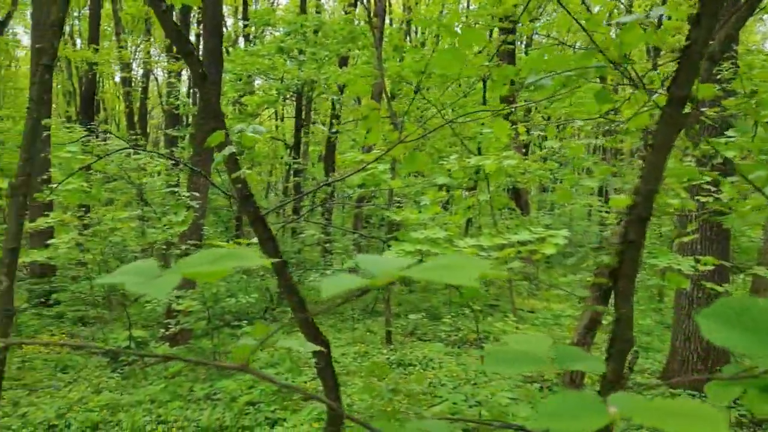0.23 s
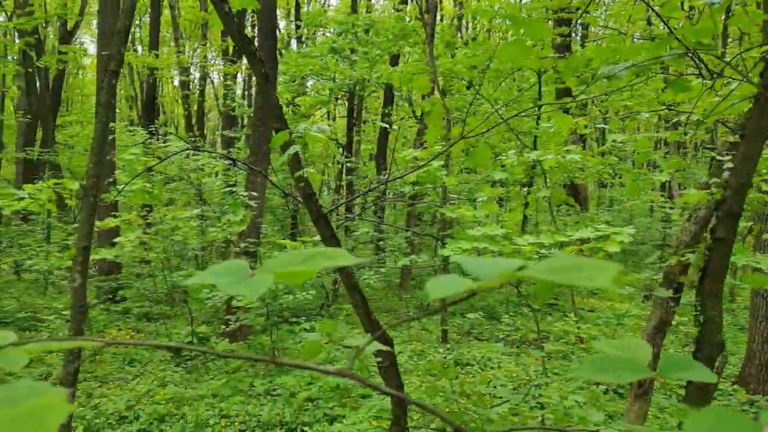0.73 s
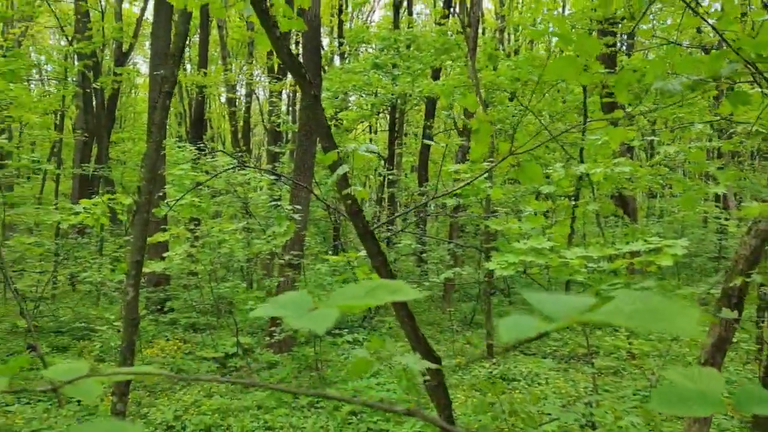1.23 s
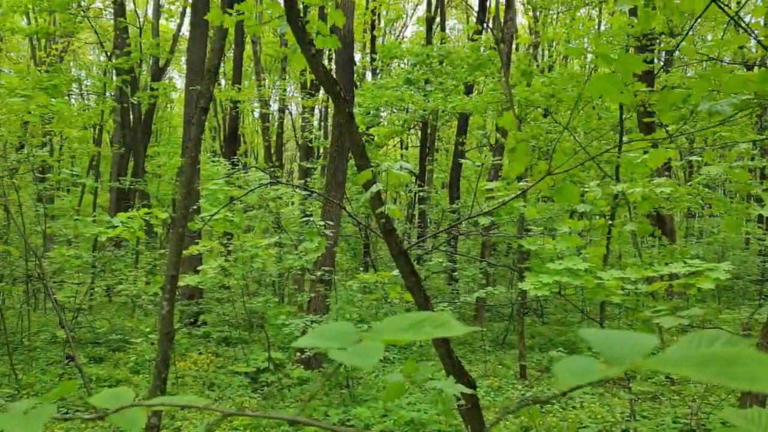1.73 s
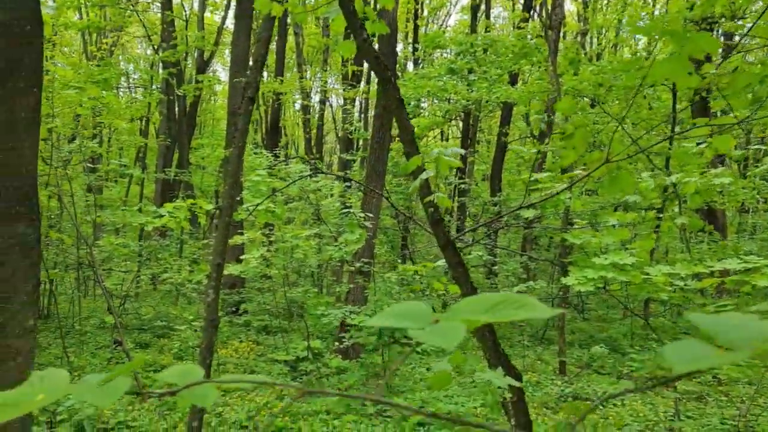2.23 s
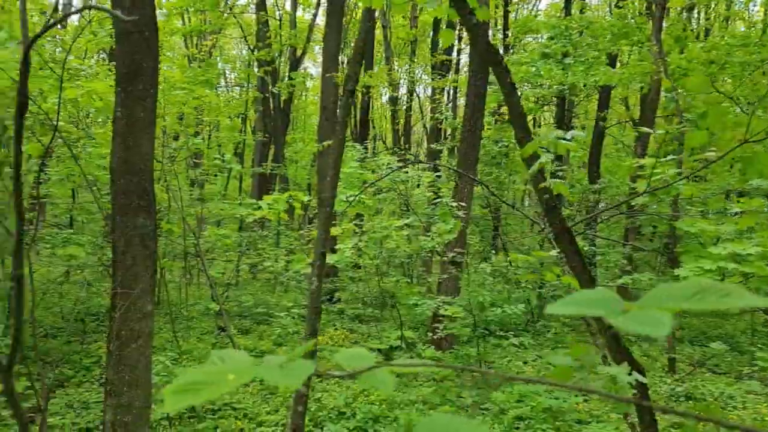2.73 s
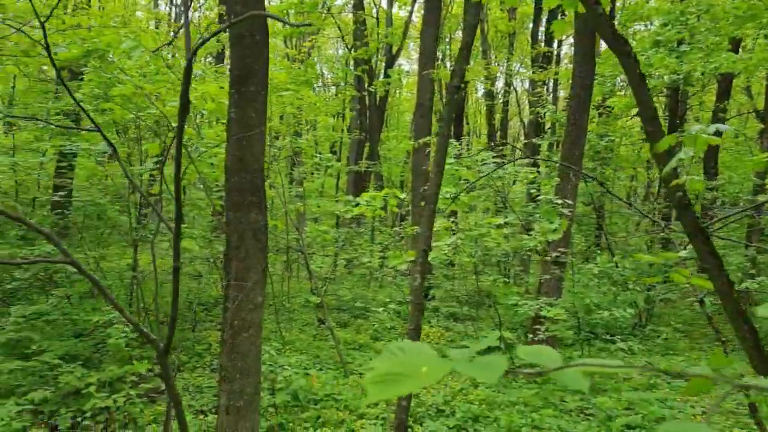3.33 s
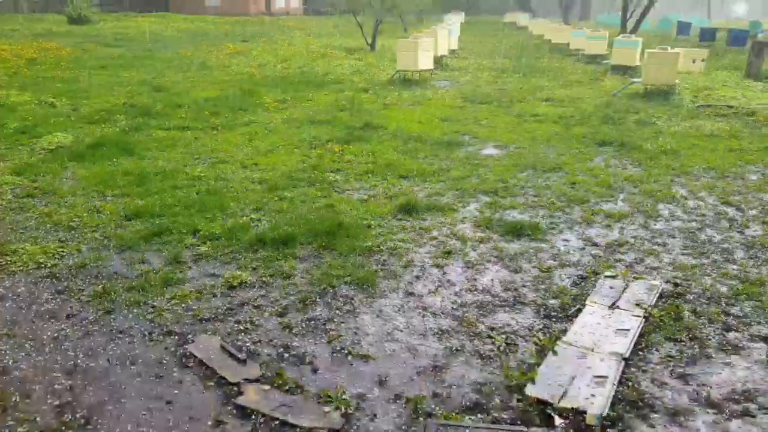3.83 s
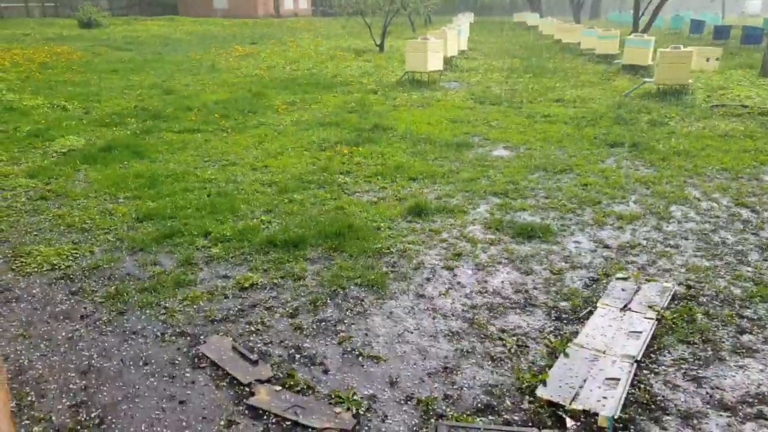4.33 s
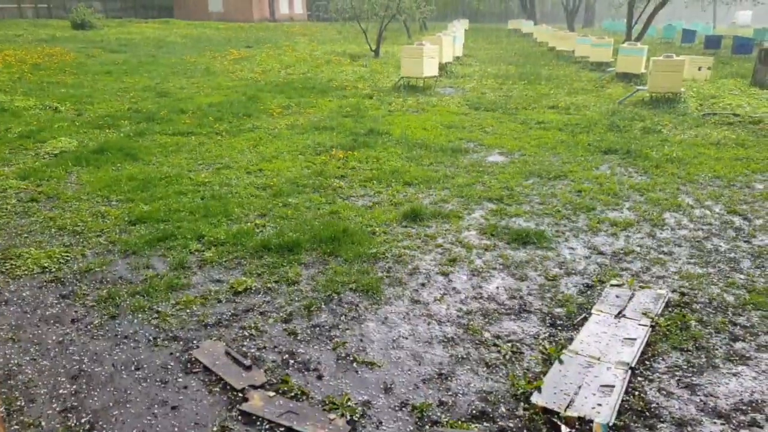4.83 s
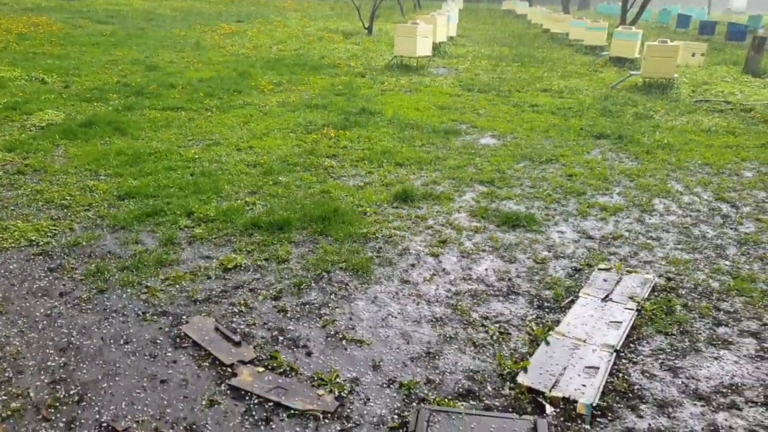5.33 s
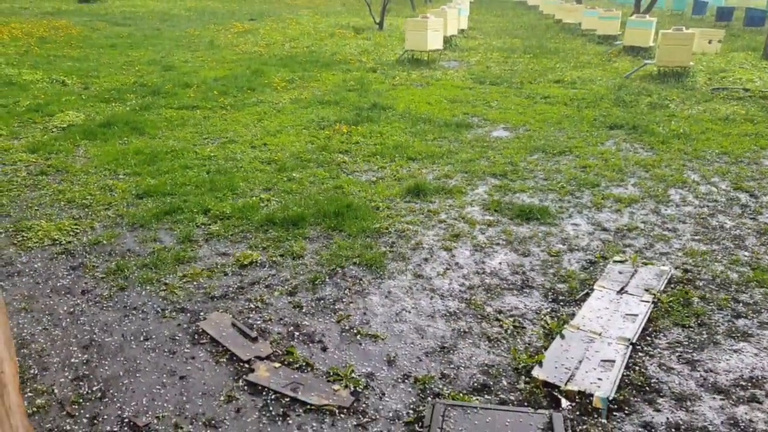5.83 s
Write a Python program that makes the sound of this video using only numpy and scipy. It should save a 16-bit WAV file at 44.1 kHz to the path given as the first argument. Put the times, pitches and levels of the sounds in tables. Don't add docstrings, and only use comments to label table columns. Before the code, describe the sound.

For the first 3.7 seconds a quiet wood is heard in wide stereo: faint hiss, low uneven breeze and a blurred far bird chorus. Fluted whistles sound at about 0.6, 1.2 and, highest and loudest, 1.5 seconds, with soft woodland reverberation; a quieter one follows near 2.2. Short buzzing calls swell at 0.4, 1.3, 2.7 and 3.6, with thin high peeps around 1.6 and 3.2 to 3.5. Tiny finger creaks come at 3.45 and 3.6, then a nail tick and low knock at 3.65. Silence lasts about a tenth of a second. At 3.8 loud hail bursts in, steady and dense on wet ground: a broad hissing wash, near ticks, big stones cracking and shattering from 4.1, and soft drumming on soil and boards. The sharpest crack comes at 5.7, a heavy thud near 6.0, and it stops abruptly at about 6.1.

```python
import sys
import numpy as np
from scipy import signal
from scipy.fft import rfft, irfft
from scipy.io import wavfile
from scipy.ndimage import uniform_filter1d, map_coordinates

SR = 44100
rng = np.random.default_rng(int(sys.argv[2]) if len(sys.argv) > 2 else 0)


def transcribe(signal):
    frames = np.atleast_2d(signal).T
    limited = np.clip(frames, -1, 1)
    pcm = np.round(limited * 32767).astype(np.int16)
    wavfile.write(sys.argv[1], SR, pcm)


def amplitude_ratio(level_db):
    exponent = np.asarray(level_db, float) / 20
    return 10 ** exponent


N = 268480
TIME = np.arange(N) / SR
PORT_GAP = .00053
# the wood ends, the hail starts, the hail ends, all in seconds.
CHANGES = (3.6855, 3.8055, 6.0865)
WOOD_END, HAIL_START, HAIL_END = CHANGES


def unit(x):
    return x / np.sqrt(np.mean(x ** 2) + 1e-20)


def along(points, hz):
    f, v = np.transpose(points)
    return np.interp(np.log(hz + 1), np.log(f + 1), v)


def curve(rows):
    return np.interp(TIME, *np.transpose(rows))


def swells(s, db, rise, fall, rest_db):
    coarse = TIME[::64]
    ahead = np.asarray(s)[:, None] - coarse
    below = np.where(ahead > 0, rise * ahead, -fall * ahead)
    peaks = amplitude_ratio(np.asarray(db)[:, None] - below)
    total = np.sum(peaks ** 2, axis=0) + amplitude_ratio(rest_db) ** 2
    return np.interp(TIME, coarse, 10 * np.log10(total))


def wobble(rate):
    knots = rng.standard_normal((2, int(N * rate / SR) + 4))
    return np.array([map_coordinates(k, [TIME * rate]) for k in knots])


def sides(pan_db):
    return amplitude_ratio(np.array([pan_db / 2, -pan_db / 2]))


def diffuse(spectrum, alike, patchy_db):
    z = signal.stft(rng.standard_normal((2, N)), nperseg=512)[2]
    patches = uniform_filter1d(rng.standard_normal(z.shape[1:]), 6, 0)
    patches = unit(uniform_filter1d(patches, 8, 1))
    pair = signal.istft(z * amplitude_ratio(patchy_db * patches), nperseg=512)[1][:, :N]
    hz = np.fft.rfftfreq(N, 1 / SR)
    agreement = alike * np.sinc(2 * hz * PORT_GAP)
    turn = np.arccos(np.clip(agreement, -1, 1)) / 2
    mid, side = irfft(rfft(pair) * amplitude_ratio(along(spectrum, hz)) * [np.cos(turn), np.sin(turn)], N)
    return unit(np.array([mid + side, mid - side]))


def echoes(x, t60):
    t = np.arange(round(np.clip(t60, .02, .5) * SR)) / SR
    tail = rng.standard_normal((2, len(t))) * amplitude_ratio(-60 * t / t60)
    return signal.fftconvolve(x, tail / np.linalg.norm(tail[0]), axes=1)[:, :N]


def notes(rows, shape, glide=1):
    attack, from_db, sag_db, release, release_db = shape
    paths = []
    for s, held, hz, db, pan in rows:
        full = s + attack
        let_go = full + abs(held)
        paths.append([(s, hz * glide, db + from_db, pan),
                      (full, hz, db, pan),
                      (let_go, hz, db + sag_db, pan),
                      (let_go + release, hz, db + sag_db + release_db, pan)])
    return paths


def songs(paths, warble_hz, fading_db):
    out, fading = np.zeros((2, N)), fading_db * wobble(45)
    for rows in paths:
        s, *cols = np.transpose(rows)
        on = slice(round(s[0] * SR), round(s[-1] * SR))
        t = TIME[on]
        hz, db, pan_db = [np.interp(t, s, c) for c in cols]
        flicker = fading[:, rng.integers(N // 2):][:, :len(t)]
        edge = np.clip(np.minimum(t - s[0], s[-1] - t) / 0.0032, 0, 1)
        turns = np.cumsum(hz + warble_hz[:, on], axis=1) / SR
        out[:, on] += edge * amplitude_ratio(db + flicker) * sides(pan_db) * np.sin(2 * np.pi * turns)
    return out


def whistlers():
    # start in seconds, held seconds, pitch in Hz, level in dB, left-right in dB.
    fluted = [
        (0.02, .02, 1172, -76.5, 5),
        (0.585, 0.12, 1820, -60, 5),
        (0.96, .14, 1566, -73, 5),
        (1.165, 0.16, 1876, -56, 6),
        (2.03, .06, 1857, -75, 9),
        (2.15, 0.14, 1943, -68.5, 6.5),
    ]
    slurred = [
        (0.735, 0.15, 1842, -59.5, 8),
        (1.41, 0.068, 1903, -63, -1),
        (1.485, 0.19, 2203, -54.5, 3.5),
        (2.16, 0.077, 2430, -78, 15),
        (3.33, 0.2, 1903, -82, 11),
    ]
    thin = [
        (1.535, .2, 4283, -69, -9),
        (3.15, .16, 4375, -68, 1),
        (3.38, .14, 4320, -67.5, -3),
    ]
    # attack in seconds, from dB, sag in dB while held, release in seconds, release in dB.
    flute_shape = (.045, -4, -3, .25, -20)
    slur_shape = (0.0354, 3, -3.5, 0.56, -28)
    thin_shape = (.015, -15, -6, .03, -12)
    sung = notes(fluted, flute_shape, glide=1.05) + notes(slurred, slur_shape) + notes(thin, thin_shape)
    clear = songs(sung, 18 * wobble(70), fading_db=2)
    hoarse = songs(sung, 130 * wobble(150), fading_db=3)
    return amplitude_ratio(3.5) * (clear + amplitude_ratio(-11) * hoarse)


def buzzers():
    # start in seconds, held seconds, centre in Hz, level in dB, left-right in dB.
    swelling = [
        (0.265, 0.038, 3800, -57.5, 0.5),
        (1.215, 0.057, 3814, -57, -2),
        (1.46, .1, 3690, -68, 0),
        (2.575, 0.037, 3870, -58, 0.5),
        (3.5, .06, 3816, -54.5, 0.5),
    ]
    short = [
        (0.0, .03, 5270, -62, -7),
        (.95, .04, 6600, -84, 8),
        (2.05, .05, 6400, -80, 11),
        (2.23, .08, 6350, -80, 11),
        (2.66, .05, 6800, -79, 8),
        (2.86, .09, 5710, -65.5, -3),
        (3.12, .01, 6340, -72, 7),
        (3.125, .03, 7100, -77, 10),
        (3.44, .16, 6280, -82, 7),
    ]
    # attack in seconds, from dB, sag in dB while held, release in seconds, release in dB.
    swell_shape = (.135, -15, -4, .24, -19)
    short_shape = (.025, -14, -4, .1, -18)
    swing = np.cumsum(95 + 25 * wobble(30)[:1], axis=1) / SR
    dips = 90 - 520 * np.sin(np.pi * swing) ** 6 + 90 * wobble(200)
    calls = notes(swelling, swell_shape, glide=.93) + notes(short, short_shape)
    return amplitude_ratio(2.5) * songs(calls, dips, fading_db=3)


def birds():
    whistles, buzzes = whistlers(), buzzers()
    direct = whistles + amplitude_ratio(-1.5) * buzzes
    return direct + echoes(amplitude_ratio(-3) * whistles, t60=0.77) + echoes(amplitude_ratio(-1) * buzzes, t60=0.83)


def strikes(s, db, hz, pan_db, cycles, lag):
    t = np.arange(160) / SR
    ring = amplitude_ratio(db[:, None] - 22 * t * (hz / cycles)[:, None]) * np.sin(2 * np.pi * hz[:, None] * t)
    ring *= 1 - np.exp(-2.5 * t * hz[:, None])
    out = []
    for sign, gain in zip((.5, -.5), sides(pan_db)):
        first = np.round((s + sign * lag * PORT_GAP) * SR).astype(int)
        at = first[:, None] + np.arange(len(t))
        out.append(np.bincount(at.ravel(), (gain[:, None] * ring).ravel(), N + SR)[:N])
    return np.array(out)


def big_stones():
    # strike in seconds, peak in dB, ring in Hz, left-right in dB, shatter in dB.
    stones = [(4.0813, -18, 6050, 2, 2.5), (4.1272, -17, 4300, 5.5, -7), (4.1798, -19, 5700, 8.5, -9),
              (4.2048, -23.5, 2620, 7, -9), (4.2253, -16.5, 4700, 3, -3), (4.3921, -25, 2000, 6, 2),
              (4.407, -20, 4500, 3, 3.5), (4.3004, -28, 4580, 0, -6), (4.8213, -25, 4270, -3, -2),
              (4.9428, -21, 5600, -3, 4.5), (4.9819, -21, 5400, 2, -6), (5.0313, -20.5, 2060, 4, -3.5),
              (5.0353, -16.5, 5500, 7.5, -2), (5.0525, -23, 5560, 0, -9), (5.1708, -20.5, 5570, 3.5, 1),
              (5.33, -18.5, 5100, -5, -1), (5.3493, -20.5, 4030, 8.5, -1), (5.6861, -21, 3450, 1.5, -7),
              (5.721, -10, 3830, 2, -1), (5.791, -21, 3380, 8, -15), (5.9363, -17.5, 5400, 5, -6),
              (6.0069, -19, 5640, 2.5, 2.5), (6.057, -15.5, 5600, 6.5, -16)]
    s, db, hz, pan_db, shatter_db = np.transpose(stones)
    at = s + .0006
    lag = np.clip(-pan_db / 25, -1, 1)
    big = strikes(at, db + 3, hz, pan_db + 1.5, 4.7, lag)
    for ratio, partial_db in (.62, -5), (.8, -4), (1.4, -6), (2.7, -4):
        big += strikes(at, db + partial_db, ratio * hz, pan_db + 2, 3.5, lag)
    delay = .006 * rng.exponential(size=(len(s), 14))
    tone = np.exp(0.39 * rng.standard_normal((len(s), 14)))
    parts = np.broadcast_arrays(
        at[:, None] + delay,
        (db + shatter_db)[:, None] - 500 * delay,
        np.minimum(hz[:, None] * tone, 14000),
        pan_db[:, None] - 0.5, 2.5, lag[:, None])
    big = big + strikes(*[p.ravel() for p in parts])
    return big + amplitude_ratio(-7.5) * echoes(big, t60=0.046)


def chips():
    # strike in seconds, peak in dB, ring in Hz, left-right in dB.
    chip_hits = [(4.08, -28, 12600, 0.0), (4.2998, -30, 11300, -1.0), (4.3392, -30, 12700, -1.5),
                 (4.443, -29, 13400, -1.5), (4.8501, -32, 12700, -0.5), (4.8745, -28, 9980, -2.5),
                 (5.0292, -26, 14000, -3.0), (5.1703, -28, 13000, -2.0), (5.3689, -28, 12500, -1.5),
                 (5.4592, -33, 14400, -2.5), (5.6448, -31, 11500, -2.5), (5.6792, -34, 12600, 0.5),
                 (5.7201, -21, 12400, 0.0), (5.8583, -31, 11900, -1.5), (5.9176, -29, 11100, -2.5),
                 (6.008, -30, 11200, 0.0), (6.0653, -30, 11100, -0.5)]
    s, db, hz, pan_db = np.transpose(chip_hits)
    lag = rng.uniform(-1, 1, len(s))
    ticks = strikes(s, db + 7, hz, pan_db, 5.0, lag)
    ticks = ticks + strikes(s, db + 3, 0.55 * hz, pan_db, 1.5, lag)
    return ticks + amplitude_ratio(6) * echoes(ticks, t60=0.018)


def patter(count, centre_hz, spread, size_db):
    u, g = rng.random((count, 3)), rng.standard_normal((count, 3))
    s = HAIL_START + u[:, 0] * (N / SR - HAIL_START)
    db = -size_db * np.log(u[:, 1] + 0.01)
    hz = np.clip(centre_hz * np.exp(spread * g[:, 0]), 2200, 15000)
    cycles = 1.45 * np.exp(0.34 * g[:, 2])
    x = strikes(s, db, hz, 4 * g[:, 1], cycles, 2 * u[:, 2] - 1)
    return x / np.sqrt(np.mean(x[:, round(HAIL_START * SR):] ** 2))


def falling_hail():
    # time in seconds, density of the fall in dB.
    density = [(3.81, -36.5), (4.0, -36.5), (4.3, -35.5), (4.6, -36), (4.83, -37), (5.05, -36), (5.25, -37),
               (5.7, -36), (5.78, -36), (6.05, -35)]
    # frequency in Hz, level in dB per Hz.
    ground = [(150, -16), (400, 0), (660, 4.5), (1400, 2), (3000, 2.5), (16000, -5)]
    wash = amplitude_ratio(3.5 + 0.86 * wobble(22.08)[0]) * diffuse(ground, 0.8, patchy_db=1.37)
    near = amplitude_ratio(-6) * patter(count=2500, centre_hz=4470, spread=0.64, size_db=3.5)
    return amplitude_ratio(curve(density)) * (wash + near + amplitude_ratio(-4.5) * echoes(near, t60=.065))


def drumming():
    # peak in seconds, thud in the soil in dB, drumming on the boards in dB.
    volleys = [(3.83, -49, -46.5), (3.93, -35.5, -39.5), (4.13, -40, -51), (4.2, -38.5, -45),
               (4.31, -48, -51), (4.44, -40.5, -37.5), (4.58, -38, -39.5), (4.7, -36.5, -52),
               (4.83, -43, -40), (4.97, -37.5, -38), (5.22, -42.5, -48), (5.391, -32, -40),
               (5.55, -36, -36.5), (5.65, -38.5, -44), (5.82, -37, -40), (5.93, -36, -37),
               (6.01, -28.5, -42)]
    # frequency in Hz, level in dB per Hz.
    soil_tone = [(15, -36), (28, -16), (45, -2.5), (95, 0), (135, -1.5), (200, -11.5), (400, -40)]
    board_tone = [(90, -9), (160, -8), (240, 0), (330, -7.5), (480, -19.5), (900, -23.5)]
    s, thud_db, drum_db = np.transpose(volleys)
    soil_db = swells(s, thud_db, rise=152, fall=260, rest_db=-43)
    board_db = swells(s, drum_db, rise=152, fall=260, rest_db=-45)
    soil = amplitude_ratio(soil_db + .8 + 1.5 * wobble(25)) * diffuse(soil_tone, .93, patchy_db=1.5)
    boards = amplitude_ratio(board_db + 2 + 3.5 * wobble(25)[0]) * diffuse(board_tone, 1.0, patchy_db=1)
    return (soil + boards) * sides(0.7)[:, None]


def hail():
    return big_stones() + chips() + falling_hail() + drumming()


def handling():
    # start in seconds, level in dB, left-right in dB, t60 in seconds.
    nail = [
        (3.6475, -48, 6, .012),
    ]
    knock = (3.649, -30, 80, .042)
    out, t = np.zeros((2, N)), np.arange(SR // 8) / SR
    band = signal.butter(2, [1100, 6000], "band", fs=SR)
    for s, db, pan_db, t60 in nail:
        scratch = signal.lfilter(*band, rng.standard_normal((2, len(t))))
        out[:, round(s * SR):][:, :len(t)] += amplitude_ratio(db - 60 * t / t60) * sides(pan_db)[:, None] * scratch
    s, db, hz, length = knock
    push = amplitude_ratio(db - 60 * (t / length) ** 3) * np.sin(2 * np.pi * hz * t * (1 - 3 * t))
    out[:, round(s * SR):][:, :len(t)] += push * amplitude_ratio([[0], [-19]])
    return out


def creaks():
    # start in seconds, level in dB, number of slips.
    finger = [
        (3.447, -55, 4),
        (3.586, -58, 1),
        (3.608, -57, 4),
    ]
    s, db = np.transpose([(s + .005 * k, db) for s, db, slips in finger for k in range(slips)])
    low_mode = strikes(s, db, 4500 + 0 * s, 0 * s, 5, 0)
    high_mode = strikes(s, db - 3, 12600 + 0 * s, 0 * s, 8, 0)
    return low_mode + high_mode


def far_chorus():
    # time in seconds, level in dB.
    chorus_swell = [(0, -71.5), (.5, -71.5), (1.4, -66), (1.85, -68.5), (2.35, -73.5), (2.7, -72.5),
                    (3.25, -72), (3.5, -70.5), (3.6, -66.5)]
    # loudest at in seconds, level in dB.
    phrases = [
        (.75, -86),
        (1.38, -75),
        (1.8, -84),
        (2.25, -75.5),
        (3.62, -85),
    ]
    # frequency in Hz, level in dB per Hz.
    high_tone = [(2200, -19.5), (2700, -6.5), (3100, 1.5), (4000, -5.5), (5300, -11.5), (6300, -25.5),
                 (7200, -32), (8500, -45)]
    low_tone = [(900, -44), (1200, -1.5), (1600, -3), (2100, 7), (2600, 2.5), (3000, -32)]
    low_db = swells(*np.transpose(phrases), rise=38, fall=47, rest_db=-105)
    high = amplitude_ratio(curve(chorus_swell)) * sides(-15)[:, None] * diffuse(high_tone, 0.4, patchy_db=2)
    low = amplitude_ratio(low_db + 8) * sides(8.6)[:, None] * diffuse(low_tone, 0.39, patchy_db=0)
    return high + low


def wind():
    # time in seconds, wind in dB.
    breeze = [(0.0, -59), (0.21, -78), (0.4, -69), (0.7, -67), (0.83, -73), (1.0, -61), (1.12, -69.5),
              (1.38, -65.5), (1.47, -76), (1.57, -68.5), (1.78, -73.5), (1.86, -68), (2.3, -63),
              (2.66, -69), (2.78, -61), (2.93, -71), (3.25, -66), (3.6, -64)]
    # frequency in Hz, level in dB per Hz.
    wind_tone = [(15, -40), (30, -5), (50, 4), (75, 3), (130, -12), (250, -21), (600, -36), (1500, -120)]
    gusts = amplitude_ratio(curve(breeze) + 3.5 + 2.3 * wobble(23))
    return gusts * sides(-2.5)[:, None] * diffuse(wind_tone, 0.66, patchy_db=2)


def hiss():
    # frequency in Hz, level in dB per Hz.
    hiss_tone = [(90, -4), (200, 11), (500, 9.5), (800, 4), (1300, 2), (7000, -8), (12000, -4.5),
                 (16000, -3.5)]
    return amplitude_ratio(-72) * diffuse(hiss_tone, 0.7, patchy_db=-2)


def scene():
    wood = birds() + handling() + creaks() + far_chorus() + wind() + hiss()
    tail = amplitude_ratio(-15 - 2000 * np.abs(TIME - WOOD_END)) * (TIME < WOOD_END + .03)
    fading = np.where(TIME < WOOD_END, 1, tail)
    return wood * fading + hail() * (TIME > HAIL_START) * (TIME < HAIL_END)


def low_pass(x):
    return signal.sosfilt(signal.butter(12, 16190, fs=SR, output="sos"), x)


def record(dry):
    # frequency in Hz, response in dB.
    left_port = [(100, -2), (2300, -1), (3800, 2.5), (5500, 5), (6400, -0.5), (7700, -18.5), (10000, -4),
                 (12500, 0.5), (15500, -9)]
    right_port = [(100, -1.5), (2300, -4), (3000, -3.5), (5500, -0.5), (8300, -8.5), (12500, 1),
                  (15500, -3.5)]
    top_hz = 16150
    hz = np.fft.rfftfreq(2048, 1 / SR)
    limit_db = 70 * np.clip((hz - top_hz) / 300 + 1, 0, 1)
    response_db = np.array([along(left_port, hz), along(right_port, hz)]) - limit_db
    fold = irfft(np.log(amplitude_ratio(response_db)))
    fold[:, 1:1024] *= 2
    fold[:, 1025:] = 0
    mix = signal.fftconvolve(dry, irfft(np.exp(rfft(fold))), axes=1)[:, :N]
    return low_pass(mix)


dry = scene()
out = record(dry)
transcribe(out)
```